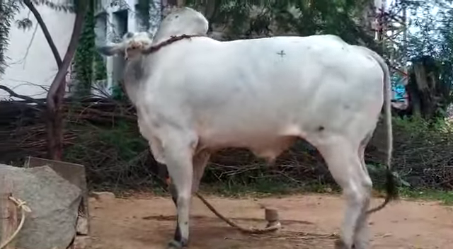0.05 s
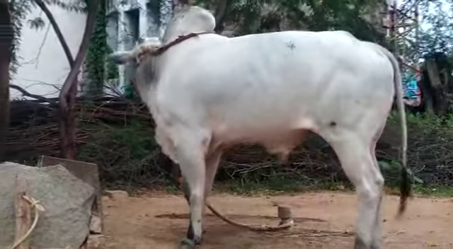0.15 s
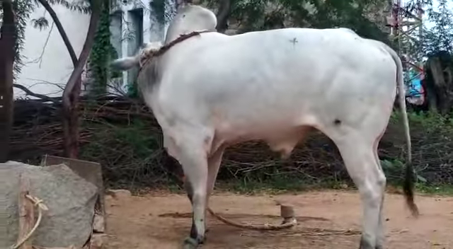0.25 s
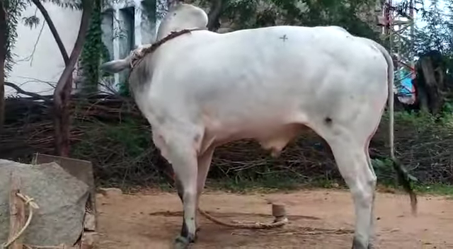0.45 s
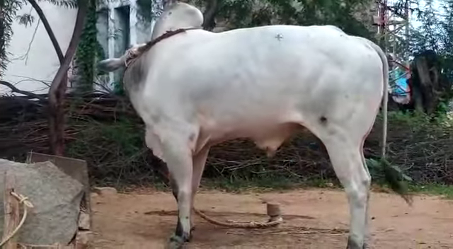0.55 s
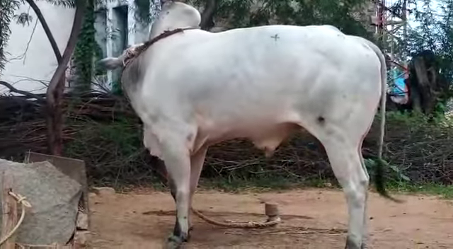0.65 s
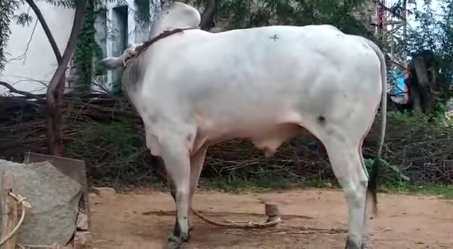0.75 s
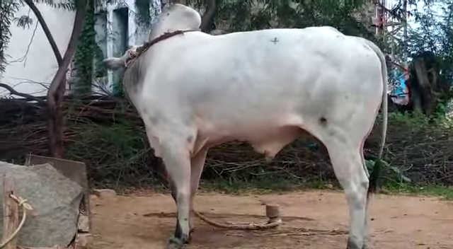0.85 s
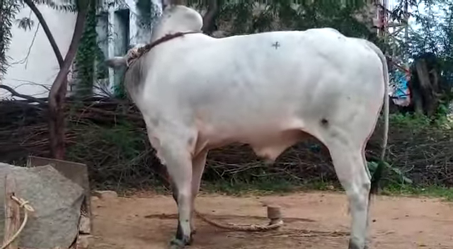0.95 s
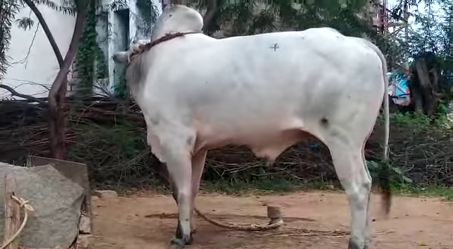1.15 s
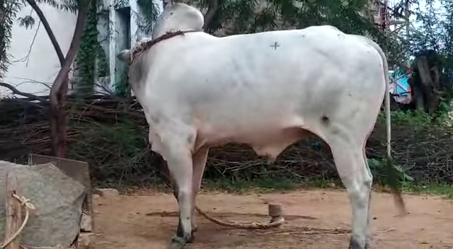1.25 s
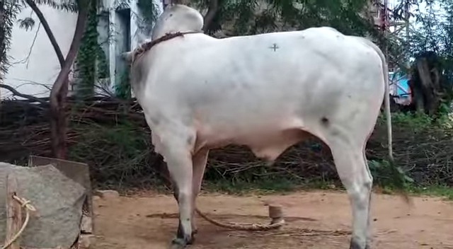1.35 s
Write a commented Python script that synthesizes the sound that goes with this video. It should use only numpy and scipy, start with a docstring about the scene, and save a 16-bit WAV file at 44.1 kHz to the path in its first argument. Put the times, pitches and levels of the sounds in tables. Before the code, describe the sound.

One rough, breathy grunt from a bull, over a light rumble of wind.

```python
"""A bull's rough grunt: slow flaps of the larynx ring its throat under a snort of air, then break up
into a few last catches. Before it, the bull draws air through a whistling nostril and rumbles briefly;
after it, a thin tone trails off. A wall answers faintly. Light wind buffets each microphone port on
its own, over quiet yard air and two distant chirps."""
import sys
import numpy as np
from scipy import signal
from scipy.fft import rfft, irfft, next_fast_len
from scipy.io import wavfile
from scipy.ndimage import map_coordinates

SR = 44100
rng = np.random.default_rng(int(sys.argv[2]) if len(sys.argv) > 2 else 0)


def pcm_store(signal):
    """Save signal as 16-bit PCM."""
    levels = np.round(np.clip(np.atleast_2d(signal), -1, 1) * 32767)
    wavfile.write(sys.argv[1], SR, levels.astype(np.int16).T)


N = 61739
T = np.arange(N) / SR
GRUNT_S = .5458


def grunt():
    """Each larynx flap rings the throat, snaps in the nose and adds a turbulent puff to the outflow."""
    # force of the regular flaps: time_s, flap_db, puff_db, snap_db
    force = [(.546, -7.5, -25, -65), (.568, -9, -24.5, -27.5), (.59, -11, -22, -30.5),
             (0.614, -22, -23, -30), (.635, -26, -32.5, -33), (.658, -17, -37, -29)]
    # separate catches of the throat: start_s, flap_db, puff_db, snap_db
    catches = [(.527, -32, -21, -38), (.681, -19.5, -26, -40), (.705, -21, -34, -45), (.719, -28, -27, -34),
               (.759, -25.5, -21.5, -34), (.815, -35, -30, -56), (.833, -34, -27.5, -60),
               (.863, -17, -42, -40), (.897, -35, -55, -53), (.95, -34, -58, -75)]
    # throat modes, mouth open: freq_hz, flap_db, air_db, t60_s
    open_throat = [(220.6, -3.5, -17, 0.14), (179.2, -10.5, -10, 0.17), (627.6, -22.5, -29, .13),
                   (682.3, -17.5, -2, 0.23), (935, -31, 3, 0.081), (1336, -25, 0.5, 0.024),
                   (1663, -26, 2.5, 0.027), (1904, -46.5, -6, 0.039), (2328, -35, -2.5, 0.039),
                   (2733, -66, -8, 0.12)]
    # throat modes, mouth nearly closed: freq_hz, flap_db, air_db, t60_s
    closed_throat = [(212, -1.5, -12, 0.09), (165, -15, 4, 0.09), (625, -24, -1, .09), (692, -7.5, 1, 0.09),
                     (970, -30, 3, 0.05), (1220, -30, 1, .06), (1655, -45, 3.5, 0.028)]
    # outflow envelope: time_s, level_db
    outflow = [(.515, -102), (.535, -38.5), (.6, -38.5), (.72, -38), (.795, -49.5), (.835, -42.5),
               (.87, -43), (.93, -57), (1.02, -67), (1.15, -119)]
    # outflow spectrum: freq_hz, gain_db
    outflow_spectrum = [(240, -68), (400, -15), (560, -9), (690, -0.5), (812, -5), (1330, -11),
                        (1480, -22.5), (1690, -14), (3500, -32), (4550, -22.5), (7700, -120)]
    # nasal tones: freq_hz, level_db, width_s
    open_nose, closed_nose = [(1307, -1.5, .0042), (2330, -11.5, .00306)], [(1216, 0, .022)]
    flap_hz, flap_count, close_s = 45.07, 6, .795
    puff_rise_s, puff_decay_s, jet_top_hz = .002, .0045, 2640

    starts_s = GRUNT_S + np.arange(flap_count) / flap_hz
    knots_s, *forces_db = np.transpose(force)
    beats = [(s, *(np.interp(s, knots_s, db) for db in forces_db)) for s in starts_s]
    voice = np.zeros(N)
    air_power = amp(curve(outflow) + 2 * wobble(130.6)) ** 2
    for start_s, flap_db, puff_db, snap_db in beats + list(catches):
        if start_s < close_s:
            throat, nose, rise_s = open_throat, open_nose, .003
        else:
            throat, nose, rise_s = closed_throat, closed_nose, .005
        modes = sagged([(hz, db, t60_s) for hz, db, _, t60_s in throat], start_s)
        voice += amp(flap_db) * flap(start_s, modes, rise_s, scatter_db=.4)
        voice += amp(snap_db) * snap(start_s, nose)
        age_s = np.maximum(T - start_s, 0)
        puff = (1 - np.exp(-age_s / puff_rise_s)) * np.exp(-age_s / puff_decay_s)
        air_power += (amp(puff_db) * puff) ** 2

    jet = np.sqrt(air_power) * white(side_db=-7.5, left_db=-6)
    jet = filtered(jet, lambda hz: 1 / np.hypot(1, (hz / jet_top_hz) ** 5))
    closed = step(close_s, .014)
    resonant = throat_air(open_throat, jet * (1 - closed)) + throat_air(closed_throat, jet * closed)
    broad = np.sqrt(air_power) * colour(white(side_db=-10, left_db=5), outflow_spectrum)
    return voice * amp([[.4], [-.4]]) + amp(-2.5) * resonant + amp(-5) * broad


def flap(start_s, modes, rise_s, scatter_db):
    """One closure rings the modes; soft tissue shifts the upper ones from flap to flap."""
    waver, waver_above_hz = .034, 800
    age_s = np.maximum(T - start_s, 0)
    out = np.zeros(N)
    for hz, db, t60_s in modes:
        louder, higher = rng.standard_normal(2)
        if hz > waver_above_hz:
            hz *= 1 + waver * higher
        out += amp(db + scatter_db * louder) * ring(hz, t60_s, age_s)
    return out * (1 - np.exp(-(age_s / rise_s) ** 2))


def sagged(modes, time_s):
    """Modes below 300 Hz sink as the throat slackens."""
    sag_per_s = .15
    ratio = 1 - sag_per_s * (time_s - GRUNT_S)
    return [(hz * ratio if hz < 300 else hz, db, t60_s) for hz, db, t60_s in modes]


def snap(start_s, tones):
    """A nasal burst just after a flap, randomly detuned."""
    delay_s, detune = .00303, .018
    t = T - start_s - delay_s
    out = np.zeros(N)
    for hz, db, width_s in tones:
        hz *= 1 + detune * rng.standard_normal()
        out += amp(db) * np.exp(-(t / width_s) ** 2) * np.sin(2 * np.pi * hz * t)
    return out


def throat_air(throat, jet):
    """Turbulent air coloured by the throat's resonances."""
    tract = sum(amp(db) * ring(hz, t60_s, T[:SR // 4]) / np.sqrt(t60_s) for hz, _, db, t60_s in throat)
    return signal.fftconvolve(jet, tract[None] / np.linalg.norm(tract), axes=1)[:, :N]


def growl():
    """Slack tissue flutters unevenly and keeps the chest humming between the flaps."""
    # flutter envelope: time_s, level_db
    envelope = [(.54, -60), (.58, -30), (.7, -28), (.73, -28.5), (.77, -35), (.85, -32), (.92, -44),
                (1, -65)]
    # chest modes: freq_hz, gain_db, t60_s
    modes = [(225, 4, 0.1), (179.8, 3.5, 0.098), (145.2, 1, 0.1)]
    rate_hz, jitter_periods = 58, .249
    starts_s = np.arange(envelope[0][0], envelope[-1][0], 1 / rate_hz)
    starts_s += jitter_periods / rate_hz * rng.standard_normal(64)[:len(starts_s)]
    hum = sum(flap(s, sagged(modes, s), rise_s=.005, scatter_db=.5) for s in starts_s)
    active = (T > starts_s[0]) & (T < starts_s[-1])
    return hum / np.std(hum[active]) * amp(curve(envelope))


def rumble():
    """Two short, soft purrs from the chest, the louder one breathy."""
    # purrs: start_s, length_s, pulse_hz, level_db, rise_s
    purrs = [(0, .08, 103.6, -33.5, 0.0066), (0.353, .07, 95.1, -18, 0.0039)]
    # chest modes: freq_hz, gain_db, t60_s
    chest = [(99.7, 2.5, 0.038), (193.5, -9, 0.057)]
    # breath envelope: time_s, level_db
    air_envelope = [(.33, -75), (.37, -41.5), (.4, -44), (.46, -52.5), (.52, -53.5), (.56, -101)]
    # breath spectrum: freq_hz, gain_db
    air_spectrum = [(260, -60), (450, -17), (580, -7), (667, -19), (742, -5), (934, -13.5), (2500, -19.5),
                    (2950, -42), (3200, -32), (4160, -33.5), (7040, -120)]
    fade_db_per_s = 43
    voice = np.zeros(N)
    for start_s, length_s, pulse_hz, db, rise_s in purrs:
        for age_s in np.arange(0, length_s, 1 / pulse_hz):
            pulse = flap(start_s + age_s, chest, rise_s, scatter_db=1.5)
            voice += amp(db - fade_db_per_s * age_s) * pulse
    air = colour(white(side_db=-.5, left_db=-2), air_spectrum)
    return voice + air * amp(curve(air_envelope) + 1.2 * wobble(156.5))


def hiss():
    """Air rushes in, then out, through the nostrils."""
    # hiss envelope: time_s, level_db
    envelope = [(0, -52.5), (.03, -63), (.144, -69), (.151, -51.5), (.22, -51), (.275, -64), (.325, -57.5),
                (.43, -57), (.515, -66), (.545, -48), (.61, -41.5), (.71, -47), (.81, -52), (.92, -66.5),
                (1.01, -69), (1.06, -72), (1.12, -72), (1.2, -78), (1.25, -81), (1.29, -71.5)]
    # inhale spectrum: freq_hz, gain_db
    in_spectrum = [(1200, -19), (1750, 7.5), (2450, 0.5), (2950, -10), (3500, 0), (4600, -4.5), (7200, 5.5),
                   (10000, -7), (12000, -9), (15500, -8.5)]
    # exhale spectrum: freq_hz, gain_db
    out_spectrum = [(1800, -15), (2900, -5), (3500, -13.5), (4800, -17), (6300, -12.5), (8100, -13),
                    (10000, -27), (12200, -26.5), (13600, -53.5), (15500, -57)]
    turn_s = .51
    inward = colour(white(side_db=0, left_db=-1.5), in_spectrum)
    outward = colour(white(side_db=.5, left_db=-3.5), out_spectrum)
    return np.where(T < turn_s, inward, outward) * amp(curve(envelope) + 1.46 * wobble(109.6))


def whistle():
    """Edge tone in a narrowed nostril: short notes that start crisply and fade."""
    # notes: start_s, length_s, pitch_hz, level_db, overtones_db
    notes = [(0, 0.11, 1300, -57.5, -26), (0.149, 0.029, 1292, -43.5, -2), (0.198, 0.021, 1290, -44, -21),
             (0.246, 0.02, 1333, -46, 6.5), (0.268, .02, 1297, -46, -5), (0.313, 0.026, 1317, -41, -7)]
    # overtones, the same for every note: freq_hz, gain_db
    overtones = [(3480, -17), (5480, -24), (6650, -22.5), (14250, -27)]
    edge_s, waver_hz, fade_db_per_s, max_fade_db = .002, 24, 220, 7
    out = np.zeros(N)
    for start_s, length_s, pitch_hz, level_db, overtones_db in notes:
        tone = wavering(pitch_hz, waver_hz)
        tone += sum(amp(db + overtones_db) * wavering(hz, waver_hz) for hz, db in overtones)
        fade_db = np.clip(fade_db_per_s * (T - start_s), 0, max_fade_db)
        flutter_db = 1.5 * wobble(130)
        gate = step(start_s, edge_s) * (1 - step(start_s + length_s, edge_s))
        out += unit(tone) * amp(level_db - fade_db + flutter_db) * gate
    return out


def rasp():
    """Turbulence smears the whistle as the nostril narrows."""
    # rasp envelope: time_s, level_db
    envelope = [(0, -63.5), (.13, -70), (.155, -48), (.24, -62.5), (.285, -47), (.305, -57), (.33, -39),
                (.36, -70), (.4, -93)]
    # rasp spectrum: freq_hz, gain_db
    spectrum = [(700, -50.5), (1100, -27), (1300, 13.5), (1550, -4), (1800, -17), (3000, -55)]
    return colour(white(side_db=-2.5, left_db=1), spectrum) * amp(curve(envelope))


def after_whistle():
    """A thin, faint tone swells and breaks into its octave as the air runs out."""
    # tone contour: time_s, pitch_hz, level_db, octave_db
    contour = [(.93, 1127, -68, -87), (1.11, 1108, -76, -86), (1.155, 1118, -55.5, -88),
               (1.18, 1120, -69.5, -69.5), (1.21, 1118, -69, -80), (1.32, 1095, -74, -88),
               (1.38, 1105, -97, -100)]
    pitch_hz = curve(contour)
    tone = unit(wavering(pitch_hz, waver_hz=3.9)) * amp(curve(contour, column=2))
    octave = unit(wavering(2 * pitch_hz, waver_hz=7.3)) * amp(curve(contour, column=3))
    return (tone + octave) * amp(1.1 * wobble(61)) * step(contour[0][0], .002)


def wall_echo(x):
    """A short outdoor echo; the mids ring longest."""
    # decay: freq_hz, t60_s
    decay = [(200, .1), (1500, .42), (10000, .26)]
    hz, t, noise = signal.stft(rng.standard_normal((2, SR // 2)), SR, nperseg=256)
    fade = amp(-60 * t / along(decay, hz)[:, None])
    tail = signal.istft(noise * fade, SR, nperseg=256)[1]
    return signal.fftconvolve(x, tail / np.linalg.norm(tail[0]), axes=1)[:, :N]


def wind():
    """Eddies rumble at each port separately and brighten as they strengthen; the sharpest thump."""
    # wind at the left port: time_s, level_db
    left = [(0, -49), (.16, -53), (.2, -34), (.265, -28), (.3, -31.5), (.4, -30.5), (.52, -30), (.58, -37),
            (.71, -27.5), (.82, -30), (.92, -31.5), (.98, -28.5), (1.02, -40.5), (1.055, -38),
            (1.12, -30.5), (1.17, -35), (1.205, -31.5), (1.24, -39.5), (1.3, -36.5), (1.4, -35)]
    # wind at the right port: time_s, level_db
    right = [(0, -46.5), (.12, -58.5), (.22, -42.5), (.28, -50), (.33, -30), (.44, -33), (.48, -27.5),
             (.53, -30), (.58, -30), (.82, -31.5), (.95, -39.5), (1.02, -56), (1.06, -38), (1.15, -40),
             (1.25, -73)]
    # low buffet spectrum: freq_hz, gain_db
    buffet = [(20, -25), (40, -22), (65, -7), (95, -2.5), (135, -7), (175, -13), (230, -21.5), (320, -62),
              (600, -79)]
    # strong-eddy spectrum: freq_hz, gain_db
    sharp_buffet = [(60, -56), (170, 11.5), (250, -4.5), (330, -11.5), (450, -19.5), (800, -34),
                    (1500, -77)]
    # thumps: time_s, peak_db, width_s, port (0 left, 1 right)
    thumps = [(0.2446, -16, 0.0014, 0), (0.7436, -8, 0.0015, 0), (1.055, -21, 0.0024, 1),
              (1.118, -22, 0.0014, 0), (1.189, -19.5, 0.0026, 0)]
    strong_wind_db, sharp_db_per_db = -32.5, 3
    strength_db = np.array([curve(left), curve(right)])
    sharp_db = -43 + sharp_db_per_db * (strength_db - strong_wind_db)
    ports = colour(rng.standard_normal((2, N)), buffet) * amp(strength_db)
    ports += colour(rng.standard_normal((2, N)), sharp_buffet) * amp(sharp_db)
    for time_s, peak_db, width_s, port in thumps:
        u = (T - time_s) / width_s
        ports[int(port)] += amp(peak_db) * (1 - u * u) * np.exp(-u * u / 2)
    return ports


def chirps():
    """Two thin, high chirps in the distance."""
    # chirps: time_s, peak_db
    peaks = [(1.051, -68), (1.24, -67)]
    pitch_hz, width_s = 8250, .029
    envelope = sum(amp(db) * np.exp(-((T - s) / width_s) ** 2) for s, db in peaks)
    return wavering(pitch_hz, waver_hz=380) * envelope


def yard_air():
    """Steady, quiet outdoor noise."""
    # ambient spectrum: freq_hz, gain_db
    spectrum = [(240, -74), (400, -13), (569, -10.5), (623, -3), (705, -15), (942, -14), (1130, -6.5),
                (1220, -19.5), (1560, -15), (5000, -32), (8530, -29), (15500, -44)]
    return amp(-61) * colour(white(side_db=-2, left_db=-1.5), spectrum)


def amp(db):
    """Decibels to gain."""
    return 10 ** (np.asarray(db) / 20)


def unit(x):
    """Scale to rms 1."""
    return x / np.sqrt(np.mean(x ** 2) + 1e-20)


def along(points, hz):
    """Interpolate (freq_hz, value) points on a log axis."""
    knots_hz, values = np.transpose(points)
    return np.interp(np.log(hz + 1), np.log(knots_hz + 1), values)


def curve(rows, column=1):
    """One column of a timed table, per sample."""
    rows = np.array(rows)
    return np.interp(T, rows[:, 0], rows[:, column])


def step(time_s, width_s):
    """Smooth rise from 0 to 1 around time_s."""
    return .5 + .5 * np.tanh((T - time_s) / width_s)


def wobble(knots_per_s):
    """Smooth random curve."""
    return map_coordinates(rng.standard_normal(2048), [T * knots_per_s], mode="wrap")


def wavering(hz, waver_hz):
    """Sine with wandering pitch."""
    return np.sin(2 * np.pi * np.cumsum(hz + waver_hz * wobble(170)) / SR)


def ring(hz, t60_s, age_s):
    """Damped resonance, struck at age 0."""
    return -np.sin(2 * np.pi * hz * age_s) * amp(-60 * age_s / t60_s)


def white(side_db, left_db):
    """Stereo white noise: side_db sets width, left_db balance."""
    mid, side = rng.standard_normal((2, N))
    side = side * amp(side_db)
    return unit(np.array([mid + side, mid - side]) * amp([[left_db / 2], [-left_db / 2]]))


def filtered(x, response):
    """Apply the gain response(hz) by FFT."""
    size = next_fast_len(N + SR // 2)
    return irfft(rfft(x, size) * response(np.fft.rfftfreq(size, 1 / SR)), size)[..., :N]


def colour(x, spectrum):
    """Shape x by (freq_hz, gain_db) points, at rms 1."""
    return unit(filtered(x, lambda hz: amp(along(spectrum, hz))))


def scene():
    """The bull, its echo, the wind and the yard."""
    bull = grunt() + growl() + hiss() + rasp() + whistle() + after_whistle() + rumble()
    yard = yard_air()
    return bull + amp(-11.5) * wall_echo(bull) + wind() + chirps() + yard


def record(dry):
    """Brick-wall low-pass."""
    top_hz = 15800
    return filtered(dry, lambda hz: hz < top_hz)


dry = scene()
out = record(dry)
pcm_store(out)
```